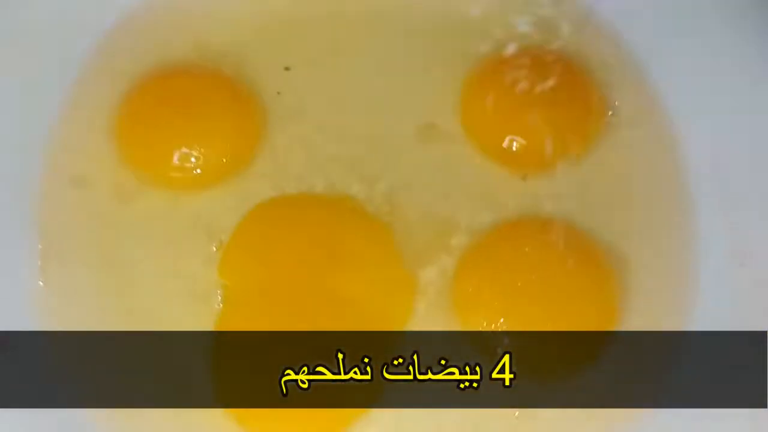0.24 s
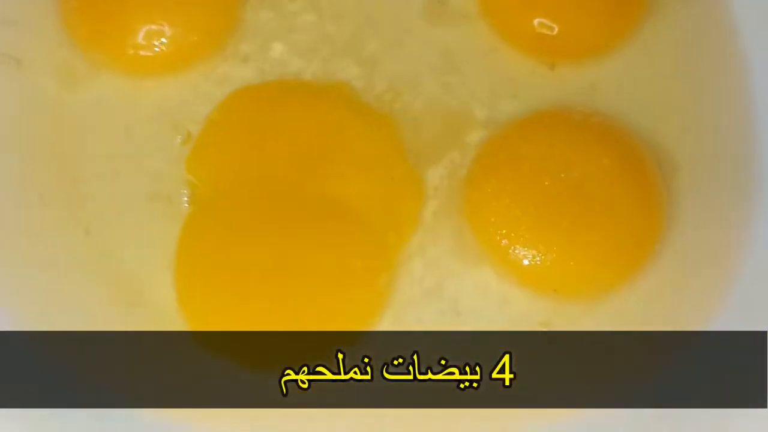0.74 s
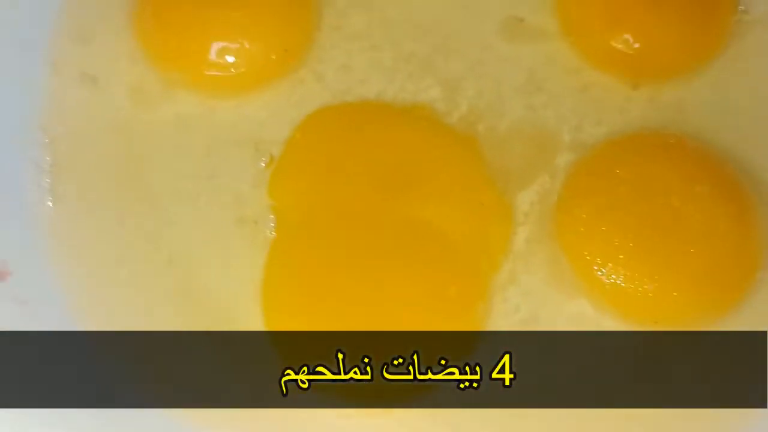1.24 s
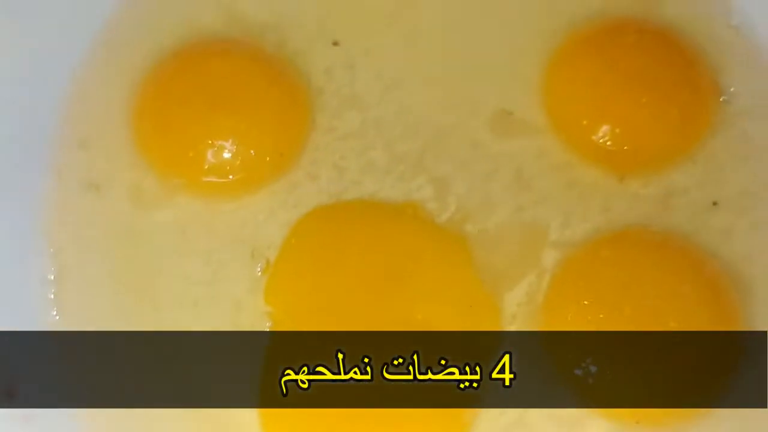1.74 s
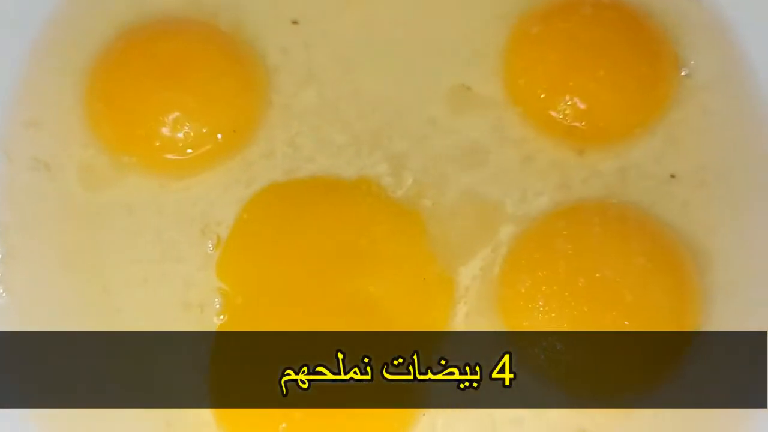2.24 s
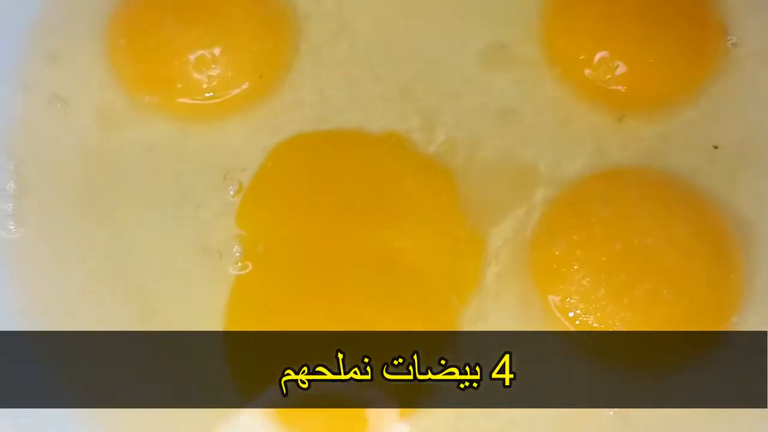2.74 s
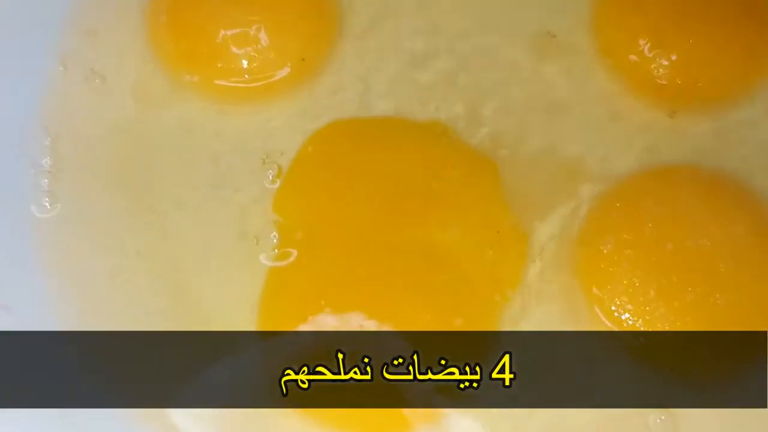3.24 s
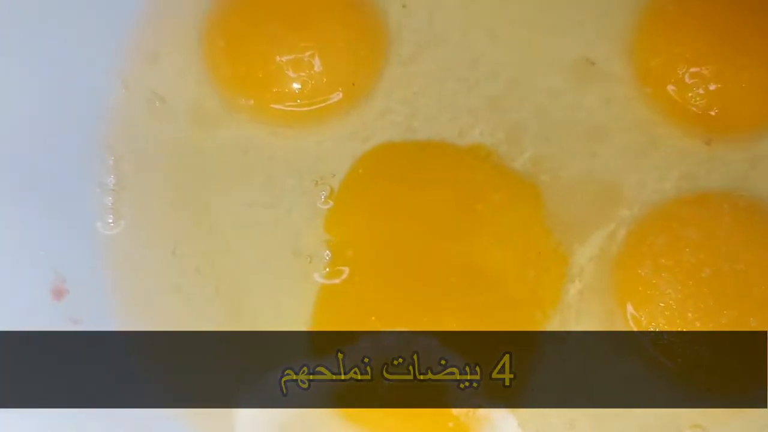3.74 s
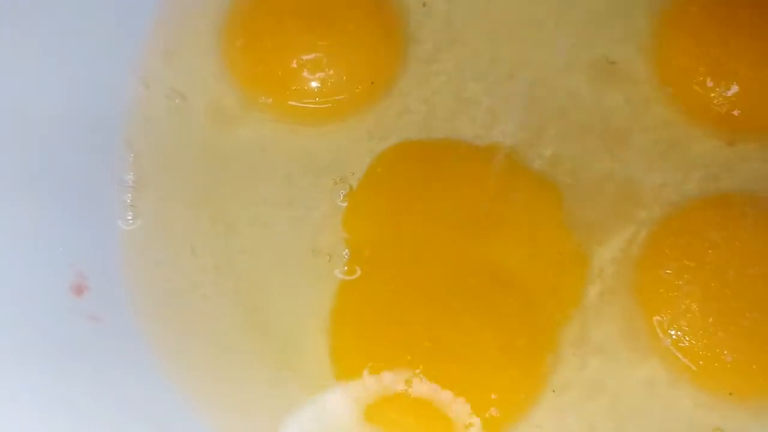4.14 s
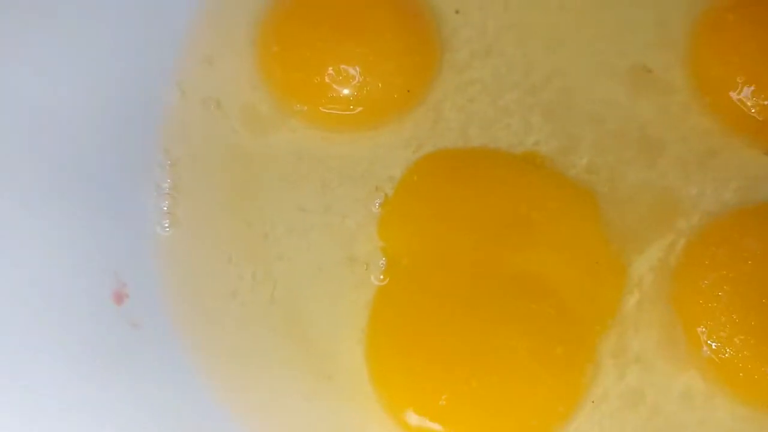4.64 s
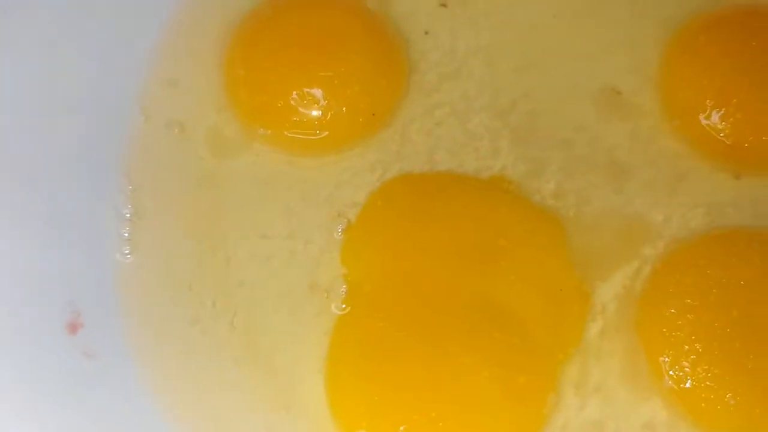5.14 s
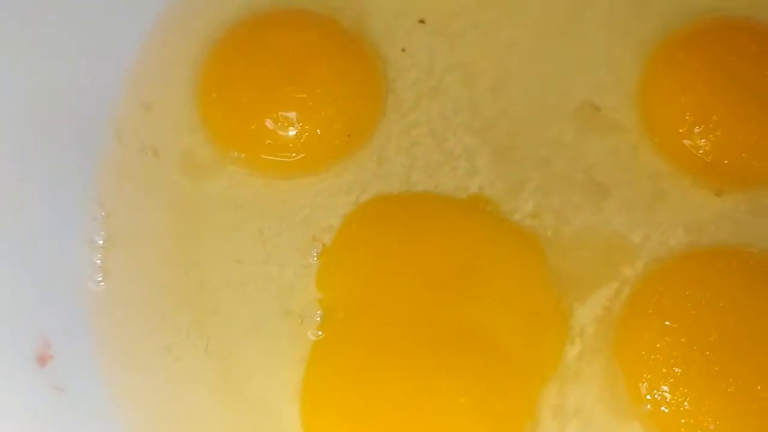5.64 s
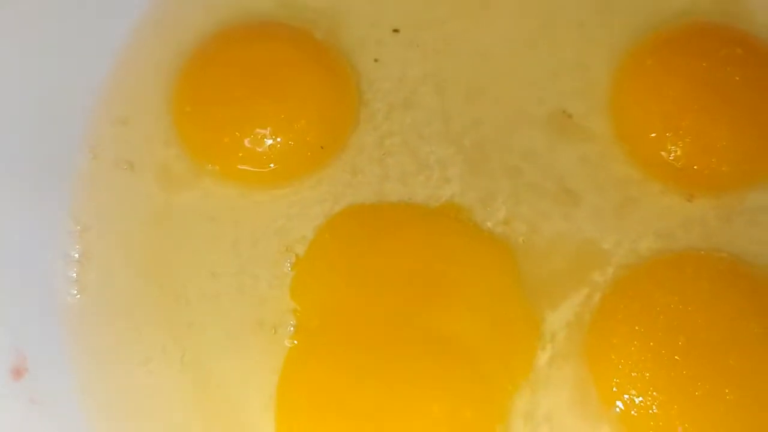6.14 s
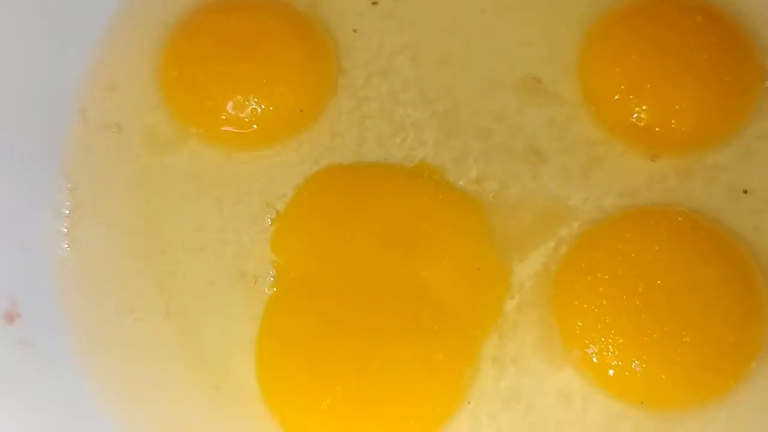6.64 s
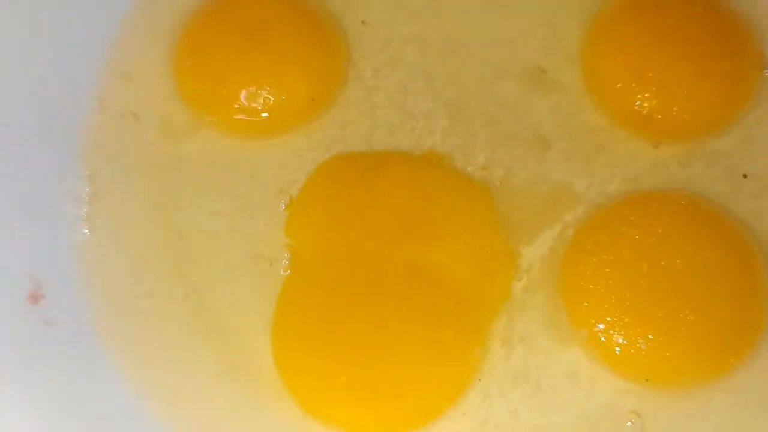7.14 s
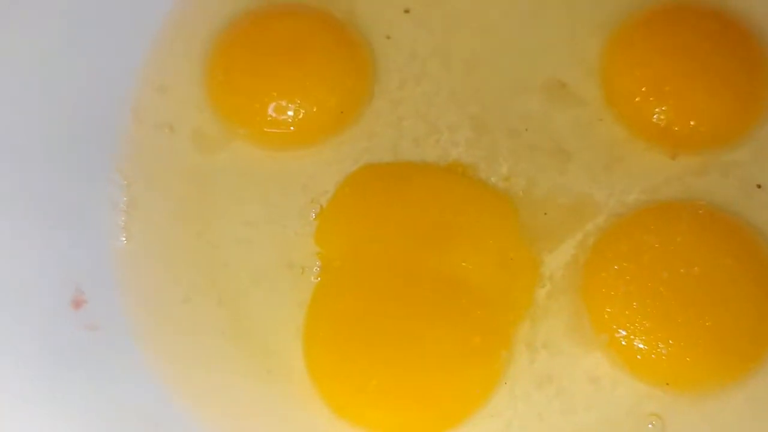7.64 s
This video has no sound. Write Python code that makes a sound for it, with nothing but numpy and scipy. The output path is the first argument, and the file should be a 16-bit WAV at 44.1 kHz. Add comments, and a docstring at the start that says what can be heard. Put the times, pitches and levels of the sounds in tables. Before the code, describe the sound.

Quick, bright, gritty salt shaking for five seconds in a kitchen, one sharp bowl tap midway, later dull knocks and tiny ticks above a low refrigerator hum.

```python
"""A plastic salt shaker is shaken about five times a second for five seconds, then stirs faintly: rushes of
random grain clicks ring its resonances, flung at the cap, then falling back longer and fuller. Lumps are short
noise bursts in the same resonances. Taps on a bowl ring decaying sines; dull counter knocks are bands of noise;
faint ticks ring singly. A refrigerator compressor hums in sines over rumble and patchy hiss, both coloured noise.
A diffuse noise tail gives the hard-walled kitchen."""
import sys
import numpy as np
from scipy import signal
from scipy.fft import rfft, irfft
from scipy.io import wavfile

SR = 44100
rng = np.random.default_rng(int(sys.argv[2]) if len(sys.argv) > 2 else 0)


def log_audio(samples):
    """Write samples as a 16-bit WAV file to the path given in sys.argv[1]."""
    # one column per channel
    frames = np.atleast_2d(samples).T
    # limit to full scale, then quantise
    limited = np.clip(frames, -1, 1)
    pcm = np.round(limited * 32767).astype(np.int16)
    wavfile.write(sys.argv[1], SR, pcm)


N = 347508

# Resonances rung by single grains. Each row: centre in Hz, width in Hz, relative level in dB.
GRAIN_MODES = [(5240, 104, -7.5), (7145, 850, -3), (7500, 190, -5.5), (8790, 560, -1.5), (9760, 470, 4.5),
               (10480, 720, 0), (10900, 490, -12), (12500, 700, -34), (13640, 1500, -11), (15400, 850, -26)]
# Left-right likeness of diffuse sound. Each row: frequency in Hz, correlation (-1 to 1).
LIKENESS_BY_HZ = [(30, 0.75), (60, 0.69), (130, 0.82), (290, 0.67), (640, 0.23), (1410, -0.1),
                  (3100, 0.045), (6820, -0.14), (15000, 0.15)]


def amp(db):
    """Decibels to gain."""
    return 10 ** (np.asarray(db) / 20)


def rms_one(x):
    """Scale to unit power."""
    return x / np.sqrt(np.mean(x ** 2) + 1e-20)


def at_hz(points, hz):
    """Read a table on a log-frequency axis."""
    table_hz, values = np.array(points)[:, 0], np.array(points)[:, 1]
    return np.interp(np.log(np.maximum(hz, 1)), np.log(table_hz), values)


def drift(rate):
    """Slow random wander of unit rms: noise through a double low-pass pole, faster for a higher rate."""
    hop, warm_up = 40, 2000
    steps = rng.standard_normal(N // hop + warm_up + 2)
    pole = np.exp(-2 * np.pi * rate * hop / SR)
    slow = signal.lfilter([1], [1, -2 * pole, pole * pole], steps)[warm_up:]
    return np.interp(np.arange(N) / hop, np.arange(len(slow)), rms_one(slow))


def ring(clicks, hz, t60_s):
    """Two-pole resonator: each unit click starts a decaying sine of height 1."""
    radius, angle = amp(-60 / (t60_s * SR)), 2 * np.pi * hz / SR
    feedback = [1, -2 * radius * np.cos(angle), radius * radius]
    return signal.lfilter([0, np.sin(angle)], feedback, clicks + 1e-18)


def resonances(x, modes, shifting_db=0.):
    """Parallel resonances with alternating signs; their balance may shift from moment to moment."""
    out = 0
    for k, (hz, width_hz, level_db) in enumerate(modes):
        b, a = signal.iirpeak(hz, hz / width_hz, fs=SR)
        struck, shift_db = x, 0
        if shifting_db:
            struck = np.roll(x, 5003 * k, axis=-1)  # other grains for each mode
            shift_db = shifting_db * (drift(44.0) + 0.5 * drift(2.9))
        out = out + (-1) ** k * amp(level_db + shift_db) * signal.lfilter(b, a, struck)
    return out


def grains(alike):
    """Dense clicks of uneven size; each microphone hears shared grains and grains of its own side."""
    grains_per_s, size_spread_db = 7000, 2.5
    size_db = size_spread_db * np.minimum(rng.exponential(1, (3, N)), 5)
    sizes = amp(size_db) * rng.choice([-1, 1], (3, N))
    shared, *own = sizes * (rng.random((3, N)) < grains_per_s / SR)
    return np.sqrt(alike) * shared + np.sqrt(1 - alike) * np.array(own)


def rushes():
    """Yield each rush: start s, length ms, first and last dB, rise and fade dB/ms, base, wall, loose dB."""
    # Salt flung against the cap. Each row: peak time in seconds, peak level in dB, spread in ms.
    flings = [(0.009, -46.5, 13), (0.282, -35, 7.6), (0.477, -30.5, 6.4), (0.67, -31.5, 9.3),
              (0.86, -31.5, 7.6), (1.048, -34.5, 12.4), (1.27, -35, 8.7), (1.492, -35, 10),
              (1.706, -33.5, 10.3), (1.935, -39, 16), (2.154, -38.5, 15), (2.374, -33, 6),
              (2.589, -31, 5.5), (2.795, -34, 10), (2.99, -29.5, 12), (3.181, -30, 6.3), (3.373, -24, 5.8),
              (3.578, -31.5, 5.8), (3.78, -30.5, 7.6), (3.983, -34, 8.9), (4.193, -26.5, 4),
              (4.386, -29.5, 9.7), (4.572, -32.5, 6.4), (4.785, -34.5, 9.3)]
    # Salt shifting between and after strokes. Each row: peak time in seconds, peak level in dB, spread in ms,
    # share of base and wall in dB, share of loose salt in dB.
    stirs = [(0.1, -41, 18, -30, -16), (1.696, -43, 2.5, -27, -14), (2.93, -38.5, 8.8, -12, -8),
             (2.975, -40.5, 20, -3, -19), (3.924, -45.5, 14, -6, -10), (4.925, -47, 22, -8.5, -9),
             (5.078, -49, 21, -23, -15), (5.15, -55, 16, -30, -1), (5.3, -52, 15, -30, -15),
             (6.497, -51.5, 5.6, -11, -7.5), (6.917, -49, 8.6, -6.5, -6), (7.405, -48, 8, -10, -1),
             (7.44, -59, 35, -2, -2), (7.632, -53, 5.5, -14, 2), (7.63, -52, 47, -10, -1.5),
             (7.661, -46, 3, -20, 3), (7.683, -50.5, 3, -20, 2), (7.777, -43.5, 2, -22, 4),
             (7.826, -47, 19, -7, -3)]
    # Salt falling back. Each row: start in seconds, mid level in dB, length in ms, growth over the length in dB,
    # base share in dB.
    falls = [(0.143, -39.5, 31, 4, -28), (0.346, -32.5, 13, 4, -24), (0.534, -32.5, 29, 3.6, -23.5),
             (0.73, -34.5, 22, 5.5, -20), (0.906, -33.5, 32, 3, -19.5), (1.11, -32.5, 13, 3, -14),
             (1.329, -33.5, 14.4, 3.5, -18.5), (1.534, -34.5, 24, 0.5, -16.5),
             (1.754, -28.5, 16.3, -0.5, -19.5), (1.984, -31.5, 19, 0.5, -16), (2.204, -31, 31.5, 1, -15.5),
             (2.421, -32.5, 28, -1.5, -17.5), (2.639, -27.5, 8, 0, -19.5), (2.84, -30.5, 27, -1, -19),
             (3.035, -31, 31.4, 3.5, -16.5), (3.237, -32, 19, 4.5, -14.5), (3.427, -30.5, 19.6, 2, -16),
             (3.64, -29, 7.4, 4, -17), (3.836, -31.5, 17, 3, -17.5), (4.041, -31.5, 18, 2.5, -16.5),
             (4.245, -31, 21, 4.5, -19.5), (4.433, -31.5, 17, 3, -20), (4.625, -32, 24, 3, -23),
             (4.833, -35.5, 13.5, 3.5, -23)]
    # level gained over one spread before the peak, lost over one spread after it
    fling_swell_db, stir_swell_db, thin_db = 9, 6, 7.5
    fling_hold = 0.49  # share of the spread
    fling_base_db, fling_wall_db, fall_wall_db = -43, -32, -13
    for s, peak_db, spread_ms in flings:
        hold_ms = fling_hold * spread_ms
        rise, fade = fling_swell_db / spread_ms, thin_db / spread_ms
        yield (s - hold_ms / 1000, hold_ms, peak_db - 2.5, peak_db, rise, fade,
               fling_base_db, fling_wall_db, -np.inf)
    for s, peak_db, spread_ms, share_db, loose_db in stirs:
        rise, fade = stir_swell_db / spread_ms, thin_db / spread_ms
        yield s, 0, peak_db, peak_db, rise, fade, share_db, share_db, loose_db
    for s, level_db, length_ms, growth_db, base_db in falls:
        rise = 1.53 * np.exp(-0.31 * growth_db)  # a growing fall sets in slower
        fade = 0.43 * np.exp(0.12 * growth_db)  # and ends faster
        first_db, last_db = level_db - growth_db / 2, level_db + growth_db / 2
        yield s, length_ms, first_db, last_db, rise, fade, base_db, fall_wall_db, -np.inf


def salt():
    """Each rush of grains swells, holds and thins out; the powers of overlapping rushes add."""
    # Shaker base under the mass of salt, applied twice. Each row: centre in Hz, width in Hz, relative dB per pass.
    base_modes = [(1758, 260, 5), (2120, 290, 6.5), (2670, 1760, 0.5)]
    # Shaker wall under the mass of salt. Each row: centre in Hz, width in Hz, relative level in dB.
    wall_modes = [(3040, 550, 0.5), (4080, 220, 5), (4390, 730, 6)]
    # Gently shifting loose salt, rings lower. Each row: centre in Hz, width in Hz, relative level in dB.
    loose_modes = [(1640, 63, -23), (5210, 130, -0.5), (7300, 290, 7)]
    cushion_db_per_ms = 0.4  # first salt sounds the base most, later salt falls on salt
    base_lead_ms, base_rise_db_per_ms = 8.6, 1.5  # the base is weaker before the bulk lands
    power = np.zeros((4, N))  # grains, base, wall, loose salt
    for s, length_ms, first_db, last_db, rise, fade, base_db, wall_db, loose_db in rushes():
        near = slice(max(round((s - .2) * SR), 0), min(round((s + .3) * SR), N))
        since_ms = (np.arange(near.start, near.stop) / SR - s) * 1000
        level_db = np.interp(since_ms, [0, length_ms], [first_db, last_db])
        level_db += rise * np.minimum(since_ms, 0) - fade * np.maximum(since_ms - length_ms, 0)
        cushion_db = cushion_db_per_ms * (length_ms / 2 - np.clip(since_ms, 0, 60))
        cushion_db += base_rise_db_per_ms * np.minimum(since_ms + base_lead_ms, 0)
        levels_db = [level_db, level_db + base_db + cushion_db, level_db + wall_db, level_db + loose_db]
        power[:, near] += amp(2 * np.array(levels_db))
    rattle, base, wall, loose = np.sqrt(power)
    mass = grains(alike=0.26)
    clumps = amp(1.5 * drift(140))  # grains arrive in clumps
    out = rms_one(resonances(grains(alike=0.2), GRAIN_MODES, shifting_db=3.5)) * rattle * clumps
    out += amp(1.0) * rms_one(resonances(resonances(mass, base_modes), base_modes)) * base
    out += rms_one(resonances(mass, loose_modes, shifting_db=5.5)) * loose * clumps
    out += amp(-1.6) * rms_one(resonances(mass, wall_modes, shifting_db=3.5)) * wall * clumps
    return out


def compressor():
    """Sines near multiples of the motor's turning rate, each wavering a little; the sixth stands out."""
    # Each row: frequency in Hz, rms level in dB, rms wavering in dB (sign immaterial).
    hum = [(49.6, -66.5, -0.5), (147.6, -70.5, 2.5), (247.4, -66, -1), (294.6, -43, 0.72),
           (345.3, -65.5, 5.5), (395, -64.5, 1), (541.5, -67, 0)]
    t = np.arange(N) / SR
    out = np.zeros((2, N))
    lead_rad = 0.025 * np.array([[-1], [1]])
    for hz, level_db, waver_db in hum:
        start_rad = rng.uniform(0, 2 * np.pi)
        level = np.sqrt(2) * amp(level_db + waver_db * drift(1.16))
        out += level * np.sin(2 * np.pi * hz * t + start_rad + lead_rad)
    return out


def steady_noise(spectrum):
    """Coloured stereo noise of unit power, as alike in both channels as the likeness table says."""
    hz = np.fft.rfftfreq(N, 1 / SR)
    mid, side = rfft(rng.standard_normal((2, N)))
    alike = np.clip(at_hz(LIKENESS_BY_HZ, hz), -1, 1)
    pair = np.sqrt(1 + alike) * mid + np.sqrt(1 - alike) * side * [[1], [-1]]
    return rms_one(irfft(pair * amp(at_hz(spectrum, hz)), N))


def rumble():
    """Steady low noise under the hum."""
    # Each row: frequency in Hz, relative density in dB per Hz.
    rumble_spectrum = [(30, -75.5), (70, -85), (120, -91.5), (160, -83), (215, -85.5), (270, -78.5),
                       (370, -80), (440, -86.5), (515, -85), (620, -90), (750, -87), (900, -93),
                       (1200, -101), (1800, -120)]
    return amp(-54.5) * steady_noise(rumble_spectrum)


def patchy(x):
    """Third-octave bands that overlap to the whole, each swelling and sinking on its own."""
    spectrum, out = rfft(x), 0
    hz = np.fft.rfftfreq(N, 1 / SR)
    place = np.clip(3 * np.log2(hz / 800 + 1e-9), 0, 12)
    for k in range(13):
        share = np.clip(1 - np.abs(place - k), 0, 1)
        out = out + amp(2.2 * drift(7.9)) * irfft(spectrum * share, N)
    return out


def hiss():
    """Refrigerator hiss: patchy noise whose whole level drifts too."""
    # Each row: frequency in Hz, relative density in dB per Hz.
    hiss_spectrum = [(590, -33), (1000, -7), (1640, -5), (1780, -3), (2120, -3.5), (2680, 4.5),
                     (3190, -7.5), (4230, -6), (5810, -11), (9070, -2.5), (10800, -7.5), (11900, -13.5),
                     (14000, -13.5), (15000, -28), (16500, -65)]
    return amp(-53 + 0.9 * drift(4.3)) * patchy(steady_noise(hiss_spectrum))


def lumps():
    """Each lump bursts into noise that rings the grain resonances, each with a balance of its own."""
    # Each row: start in seconds, relative level in dB.
    lump_rows = [(0.165, -35), (0.1688, -30), (0.2792, -33), (0.3568, -40), (0.4761, -23.5), (0.9073, -21),
                 (1.131, -25), (1.2596, -32), (1.523, -32), (1.701, -31), (1.71, -33), (1.9918, -26),
                 (2.1588, -35), (2.2098, -25), (2.2439, -45), (2.3712, -29.5), (2.421, -30),
                 (2.4305, -21.5), (2.6531, -33), (3.1794, -27), (3.384, -36), (3.4218, -35), (3.447, -23),
                 (3.6283, -32), (3.6517, -23), (3.8367, -22), (3.8546, -24), (4.1911, -25), (4.248, -27),
                 (4.4278, -40), (4.5724, -34)]
    rise_s, t60_s, trim_db = .0008, .012, -4.5
    out, t = np.zeros((2, N)), np.arange(600) / SR
    noise = rng.standard_normal((len(lump_rows), 3, len(t)))
    shape = np.minimum(t / rise_s, 1) * amp(-60 * t / t60_s)
    for (s, level_db), (mid, *sides) in zip(lump_rows, noise):
        burst = resonances((mid + 2 * np.array(sides)) * shape, GRAIN_MODES)
        burst /= np.sqrt(np.mean(burst[:, 20:80] ** 2))  # level set by the early part
        at = round(s * SR)
        out[:, at:at + len(t)] += amp(level_db + trim_db) * burst
    return out


def bowl():
    """Each tap strikes every mode with its own strength at each microphone, then chatters briefly."""
    # Each row: start in seconds, relative level in dB, left minus right in dB.
    taps = [(0.9068, -40, -5), (2.958, -31, 4), (2.9587, -13.5, 1)]
    # Modes. Each row: frequency in Hz, relative level in dB, t60 in seconds.
    bowl_modes = [(2080, -2.5, 0.014), (2080, -21, 0.078), (2255, -19, 0.09), (2460, -15.5, 0.092),
                  (2620, -4, 0.0085), (2850, -11.5, 0.037), (3225, -0.5, 0.021), (3110, -14, 0.04),
                  (3340, -16, 0.016), (3830, -4, 0.0087), (4350, 4, 0.0087), (4500, -23, 0.023),
                  (5840, -15, .003), (4830, -11, 0.0033), (7640, -2, 0.0055), (9100, 11, 0.0027),
                  (11000, -2, 0.0057), (13400, -5, 0.004)]
    s, level_db, pan_db = np.transpose(taps)
    at = (s * SR).astype(int)
    tap_db = level_db + pan_db / 2 * [[1], [-1]]
    luck = rng.normal(0, 1, (len(s), len(bowl_modes), 2))
    out = np.zeros((2, N))
    for k, (hz, mode_db, t60_s) in enumerate(bowl_modes):
        clicks = np.zeros((2, N))
        clicks[:, at] = amp(tap_db + mode_db - 3.0 + 1.5 * luck[:, k].T) * (-1) ** k
        out += ring(clicks, hz, t60_s)
    after = np.arange(400)
    chatter = amp(-20.5 - 60 * after / SR / 0.014) * rng.standard_normal((2, len(after)))
    chatter[:, 0] = 1  # the tap itself
    crack = np.zeros((2, N))  # the bare contact, too brief to ring
    crack[:, at] = amp(tap_db - 13.0)
    return signal.fftconvolve(out + np.diff(crack, prepend=0), chatter, axes=1)[:, :N]


def counter():
    """A padded blow has no clear ring: a noise band swells and dies, partly alike at both microphones."""
    # Knocks of hand and counter. Each row: start in seconds, level in dB, pitch in Hz, t60 in seconds.
    knocks = [(1.909, -52, 1010, 0.11), (2.264, -40, 1560, 0.013), (2.2695, -35.5, 1450, 0.015),
              (2.271, -39, 600, 0.022), (2.958, -35.5, 248, 0.24), (2.965, -43, 159, 0.23),
              (2.97, -30, 241, 0.24), (3.03, -34, 261, 0.18), (3.008, -37.5, 214, 0.41),
              (3.075, -40.5, 224, 0.35), (3.17, -44, 218, 0.61), (5.768, -35, 220, 0.04),
              (5.774, -48, 920, .05), (5.787, -48, 695, .04), (5.775, -45, 90, 0.16), (5.785, -46, 50, .25),
              (5.792, -49, 85, 0.066), (5.842, -46, 70, 0.11), (5.922, -46, 90, 0.17),
              (5.864, -52, 900, 0.083), (5.887, -49, 850, 0.1), (5.915, -50, 850, .07),
              (5.948, -35, 335, 0.13), (5.961, -29.5, 444, 0.049), (5.962, -34, 200, 0.093),
              (5.966, -28.5, 310, 0.067), (5.965, -37, 1110, 0.045), (5.966, -42.5, 1790, 0.028),
              (5.985, -36, 400, 0.079), (6.012, -44, 453, 0.065), (6.045, -46, 520, 0.052),
              (7.244, -57, 900, .04)]
    under, over = 1.454, 1.424  # band edges, ratios to the pitch
    edge_db, edge_reach, edge_lasts = -9.5, 5.25, 0.58  # brighter part: level, top over pitch, share of t60
    swell_cycles, longest_swell_s = 1.37, 0.0097
    out, t = np.zeros((2, N)), np.arange(SR // 2) / SR
    noise = rng.standard_normal((len(knocks), 3, len(t)))
    noise = signal.lfilter([1], [1, -.98], noise)  # duller upwards
    for (s, level_db, hz, t60_s), (mid, *sides) in zip(knocks, noise):
        parts = [(level_db, hz / under, hz * over, t60_s),
                 (level_db + edge_db, hz * over, hz * edge_reach, t60_s * edge_lasts)]
        swell_s = min(swell_cycles / hz, longest_swell_s)
        for part_db, low_hz, high_hz, part_t60_s in parts:
            band = signal.butter(4, [low_hz, high_hz], "band", fs=SR, output="sos")
            shape = np.clip(t / swell_s, 0, 1) * amp(-60 * t / part_t60_s)
            body = signal.sosfilt(band, mid + .25 * np.array(sides)) * shape
            # the blow sets the energy, whatever the noise does
            body *= amp(part_db) * np.sqrt(np.sum(shape ** 2) / np.sum(np.mean(body, axis=0) ** 2))
            at = round(s * SR)
            out[:, at:at + len(t)] += body[:, :N - at]
    return out


def ticks():
    """Faint ticks of the shaker in the hand: single rings, weaker and of random sign on the right."""
    # Each row: start in seconds, left peak before decay in dB, pitch in Hz, t60 in seconds.
    tick_rows = [(3.4218, -31, 6850, .03), (6.595, -44, 2670, .03), (6.645, -44.5, 1020, .04),
                 (7.465, -43, 2530, .03), (7.628, -50, 5160, .05), (7.682, -50, 7250, .025),
                 (7.776, -36, 7000, .018), (7.655, -50, 5100, .04), (7.806, -49, 5600, .05),
                 (7.812, -44, 5120, .07), (7.822, -49, 2530, .04), (7.83, -49, 7000, .03),
                 (7.815, -54, 7800, .05), (7.821, -40.5, 1670, 0.081)]
    out = np.zeros((2, N))
    for (s, peak_db, hz, t60_s), sign in zip(tick_rows, rng.choice([-1, 1], len(tick_rows))):
        click = np.zeros((2, N))
        click[:, round(s * SR)] = amp(peak_db) * np.array([1, .4 * sign])
        out += ring(click, hz, t60_s)
    return out


def kitchen(x):
    """Diffuse tail: noise bands with their own decay times, the bass shared between channels."""
    # Each row: frequency in Hz, t60 in seconds.
    room_t60 = [(600, 0.24), (3000, 0.31), (10000, 0.19)]
    t, edges_hz = np.arange(SR // 2) / SR, 60 * 2. ** np.arange(9)
    tail = 0
    for low_hz, high_hz in zip(edges_hz, edges_hz[1:]):
        sos = signal.butter(2, [low_hz, high_hz], "band", fs=SR, output="sos")
        band = signal.sosfilt(sos, rng.standard_normal((2, len(t))))
        tail = tail + band * amp(-60 * t / at_hz(room_t60, np.sqrt(low_hz * high_hz)))
    alike = np.clip(at_hz(LIKENESS_BY_HZ, np.fft.rfftfreq(len(t), 1 / SR)), 0, 1)
    left, right = rfft(tail)
    tail = irfft([left, alike * left + np.sqrt(1 - alike ** 2) * right], len(t))
    tail *= np.clip(t / 0.011, 0, 1)  # builds up over 11 ms
    return signal.fftconvolve(x, tail / np.sqrt(np.sum(tail ** 2) / 2), axes=1)[:, :N]


def scene():
    """Near sounds with their room tails over the steady kitchen."""
    shaker = salt() + lumps() + ticks()
    taps, knocks = bowl(), counter()
    wet = kitchen(amp(-12.5) * shaker + amp(-10.5) * taps + amp(-7.5) * knocks)
    near = shaker + taps
    near[0] = np.roll(near[0], 20)  # samples by which near sounds reach the left microphone late
    return near + knocks + wet + rumble() + hiss() + compressor()


def record(dry):
    """Two microphones differ in colour, a sound port may lift a treble peak; the top is cut."""
    # Each row: frequency in Hz, left minus right in dB.
    balance = [(60, -0.5), (130, -1), (290, -0.5), (640, 0), (1410, 1.5), (3100, 0.5), (6820, 0),
               (15000, 4.5)]
    # Sound ports, left then right. Each row: peak in Hz, width in Hz, lift in dB.
    ports = [(11240, 520, 0), (9040, 330, 4.5)]
    hz = np.fft.rfftfreq(N, 1 / SR)
    tilt_db = at_hz(balance, hz) / 2 * [[1], [-1]]
    port_db = [lift_db / (1 + (2 * (hz - peak_hz) / width_hz) ** 2) for peak_hz, width_hz, lift_db in ports]
    coloured = irfft(rfft(dry) * amp(tilt_db + port_db), N)
    top_cut = signal.ellip(10, .5, 60, 15750, fs=SR, output="sos")  # low-pass, edge in Hz
    return signal.sosfilt(top_cut, coloured)


dry = scene()
out = record(dry)
log_audio(out)
```